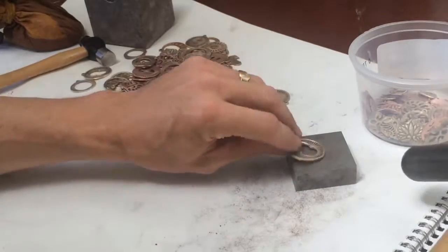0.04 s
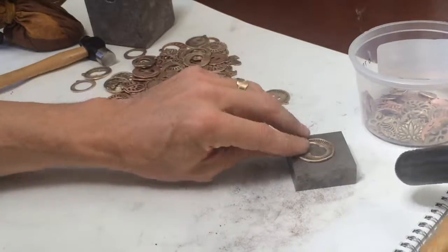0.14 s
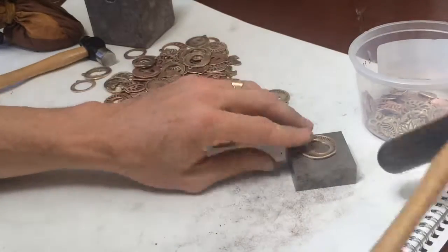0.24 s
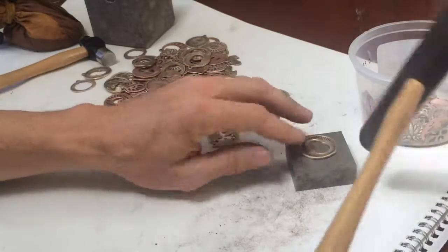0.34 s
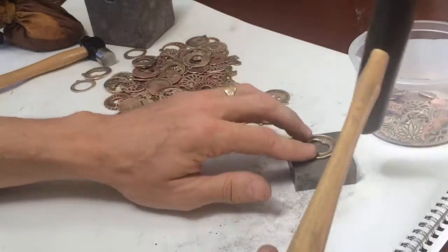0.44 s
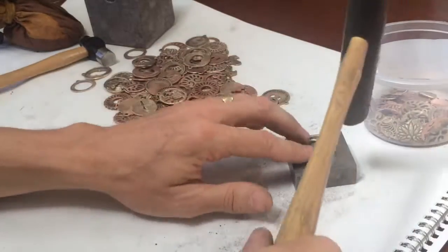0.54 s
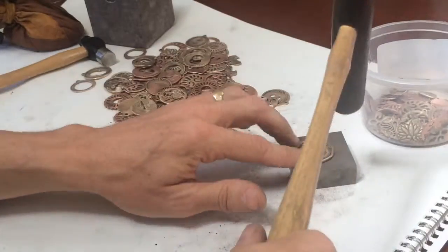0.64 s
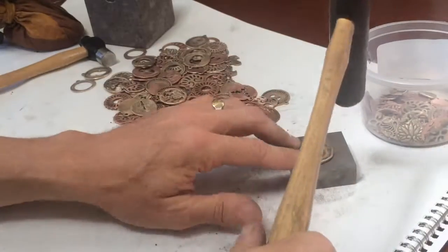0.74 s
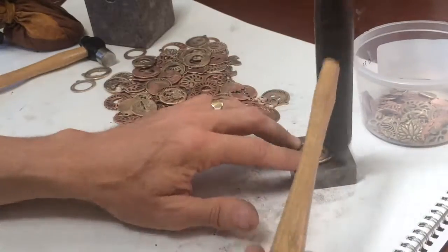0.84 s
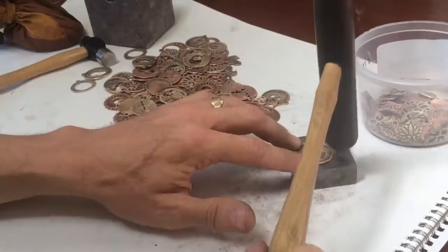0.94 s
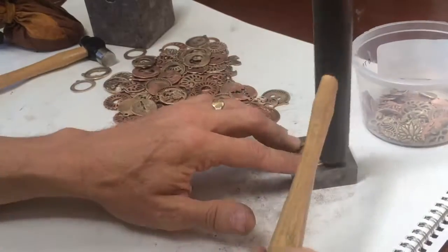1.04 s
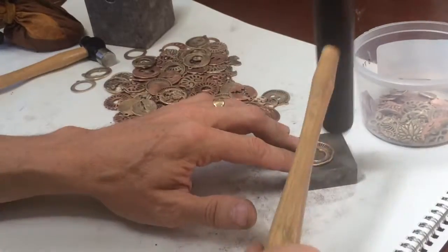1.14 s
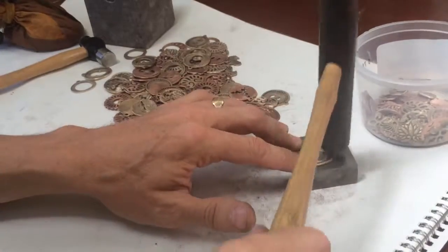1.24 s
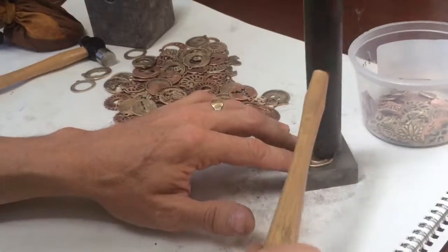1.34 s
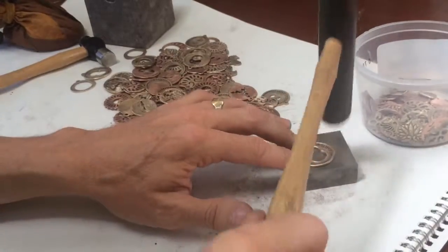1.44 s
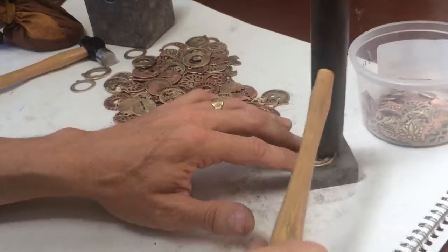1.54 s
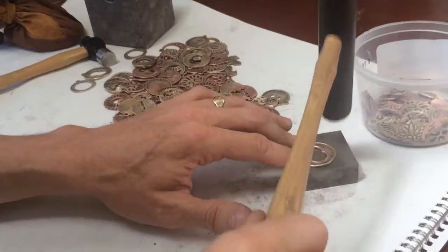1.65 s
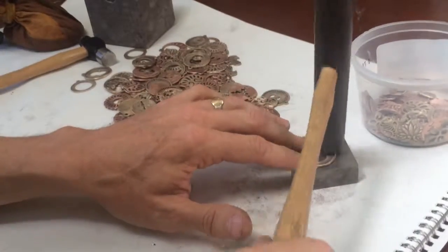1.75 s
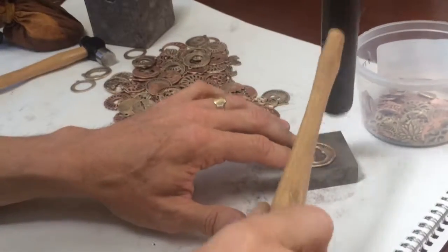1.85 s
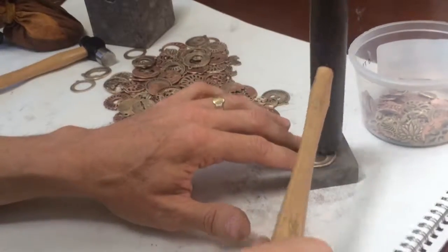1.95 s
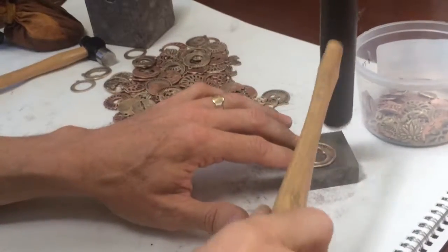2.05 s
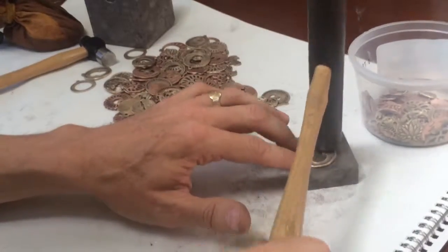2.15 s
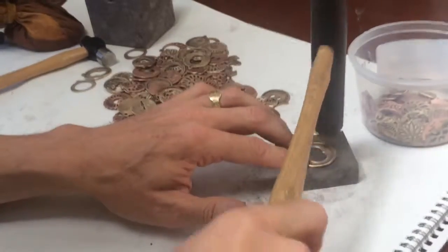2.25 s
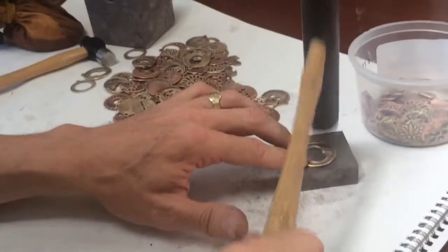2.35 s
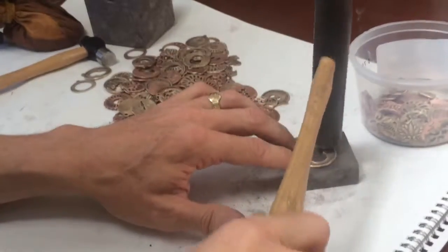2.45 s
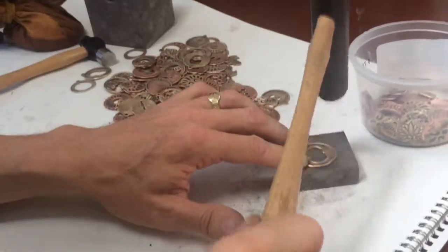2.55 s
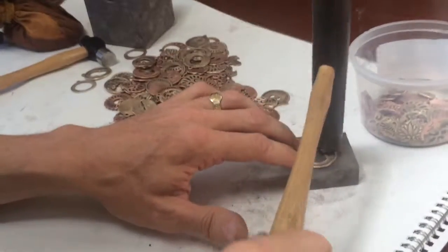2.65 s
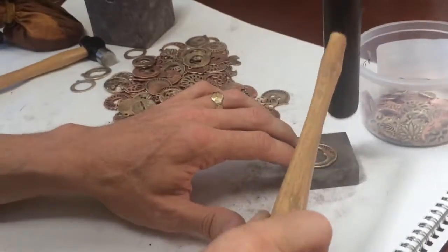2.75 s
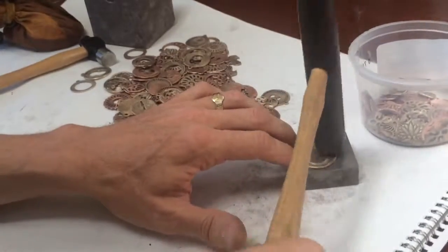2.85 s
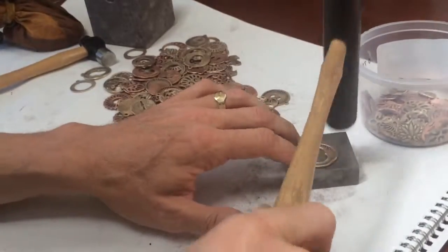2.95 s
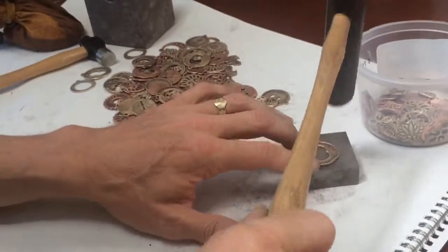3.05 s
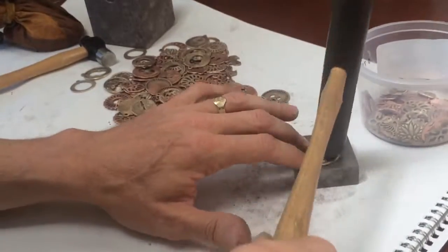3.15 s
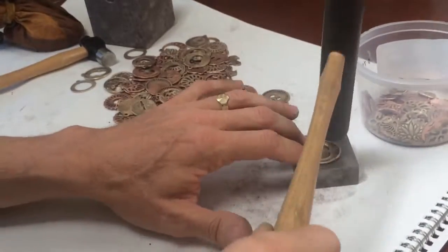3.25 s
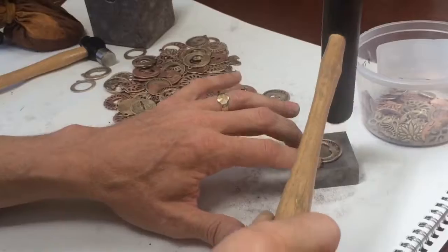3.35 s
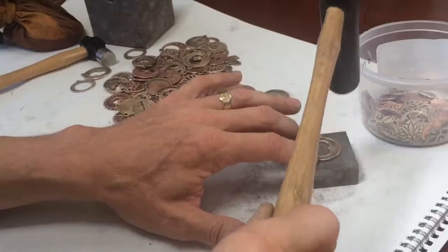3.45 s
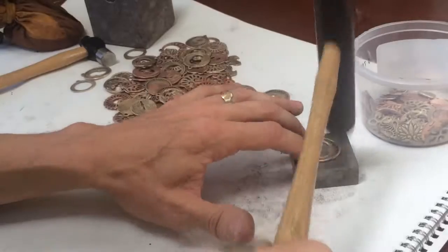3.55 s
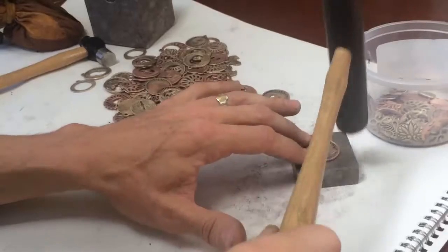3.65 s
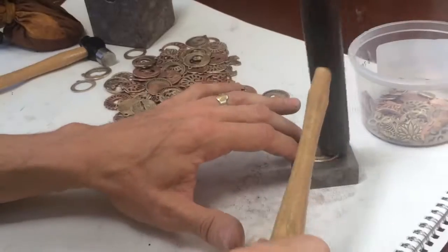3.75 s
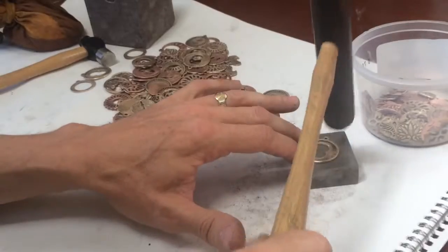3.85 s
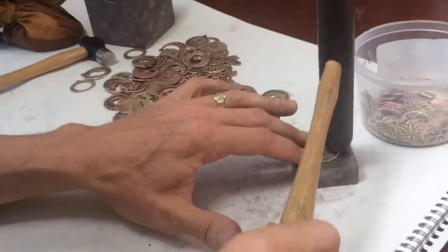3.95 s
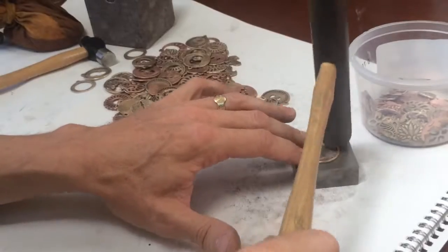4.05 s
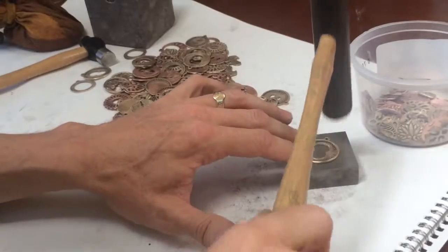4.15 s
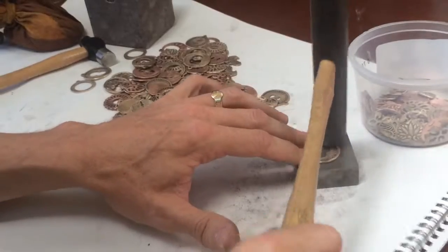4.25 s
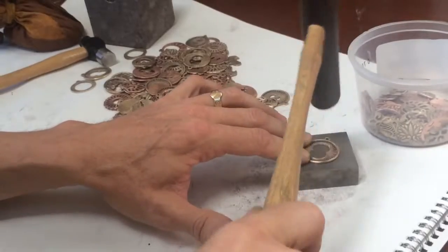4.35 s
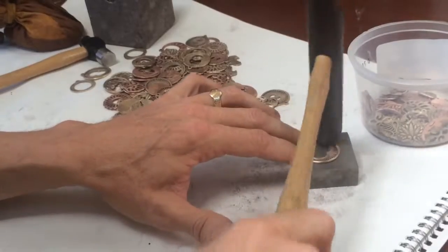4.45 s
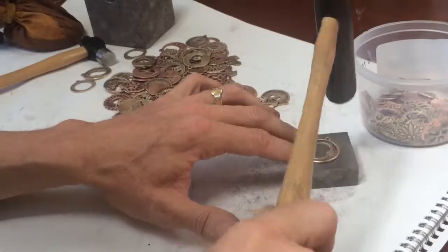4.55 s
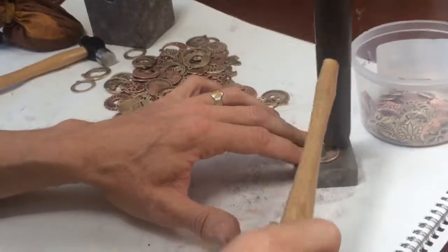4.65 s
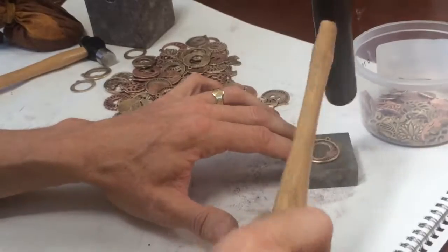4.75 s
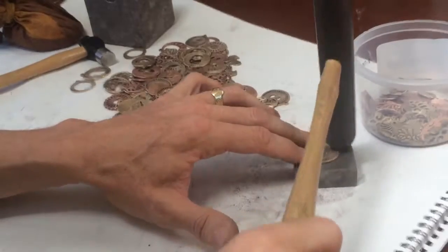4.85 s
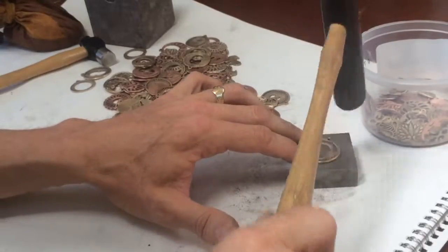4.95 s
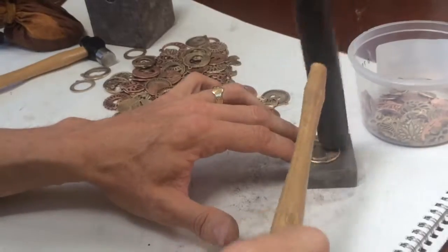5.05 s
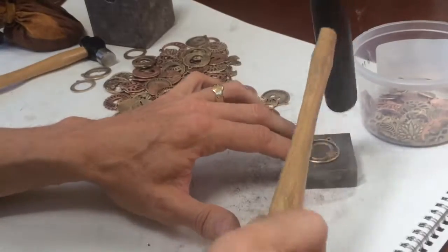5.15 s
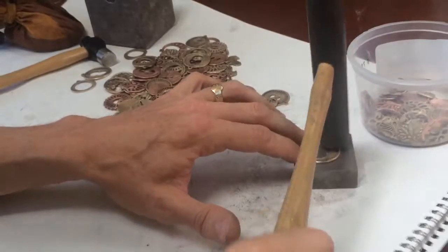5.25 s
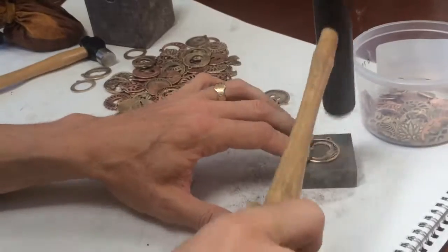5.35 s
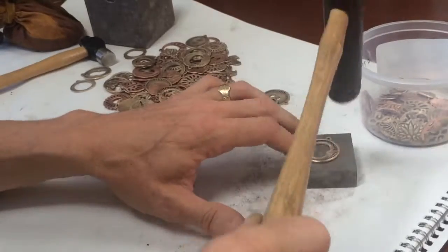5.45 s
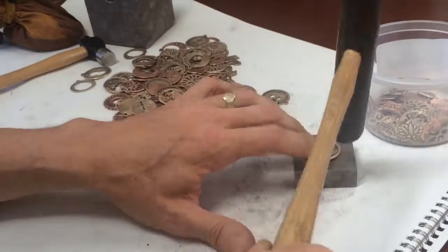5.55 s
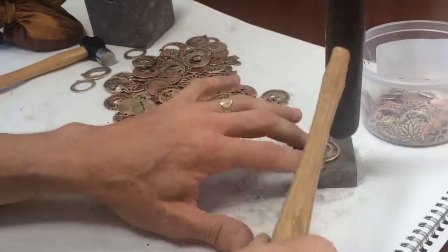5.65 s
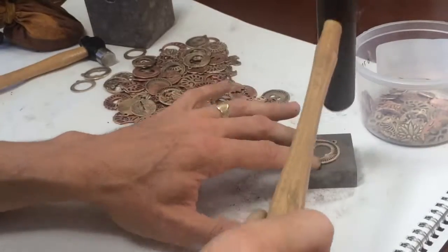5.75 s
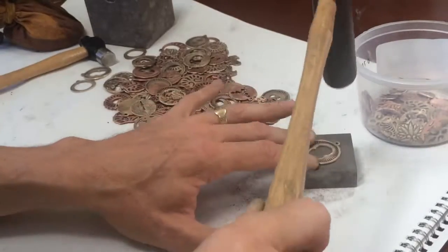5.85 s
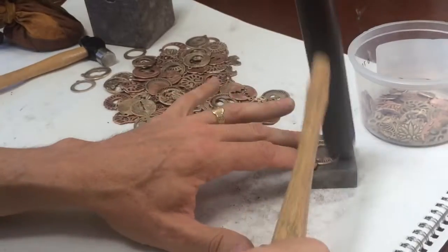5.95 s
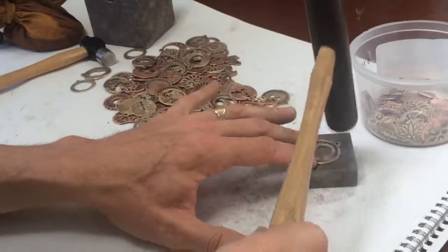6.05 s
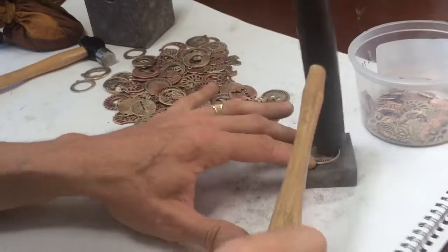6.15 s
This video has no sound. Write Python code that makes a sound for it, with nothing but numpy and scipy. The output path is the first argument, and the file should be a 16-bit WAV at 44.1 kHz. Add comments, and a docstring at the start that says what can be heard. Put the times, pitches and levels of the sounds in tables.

```python
"""Small workshop: a steel hammer flattens a metal disc on a bench block standing on a work table. The disc
ticks as it is laid down, fingers thump it softly (struck modes), and it hisses as it slides (coloured noise).
Each blow cracks (damped steel modes, grit), slaps (one pulse), booms in the table top (modes), rings on in
bench and room (decaying noise bands) and shakes loose discs (showers of clinks). Two runs of blows, the first
ending in a light tap, then the start of a third; faint room tone."""
import sys
import numpy as np
from scipy import signal
from scipy.fft import rfft, irfft
from scipy.io import wavfile

SR = 44100
rng = np.random.default_rng(int(sys.argv[2]) if len(sys.argv) > 2 else 0)


def to_wav(s):
    """Save 16-bit WAV."""
    ch = np.atleast_2d(s).T  # columns
    pcm = np.round(np.clip(ch, -1, 1) * 32767)  # PCM
    wavfile.write(sys.argv[1], SR, pcm.astype(np.int16))


N = 273855
TIME_S = np.arange(N) / SR


def from_db(db):
    """Amplitude ratio of a level in dB."""
    return 10 ** (np.asarray(db) / 20)


def rms_one(x):
    """Scale to rms 1."""
    return x / np.sqrt(np.mean(x ** 2) + 1e-20)


def at_hz(points, hz):
    """Read a table on a log-frequency axis."""
    points = np.array(points)
    return np.interp(np.log(hz), np.log(points[:, 0]), points[:, 1])


def dying(t_s, t60_s):
    """Exponential envelope that falls 60 dB in t60_s."""
    return np.exp(-np.log(1000) * t_s / t60_s)


def place(times_s, sounds):
    """Lay one short sound at each time."""
    out = np.zeros(N)
    for time_s, sound in zip(times_s, sounds):
        start = min(round(time_s * SR), N - 1)
        out[start:start + len(sound)] += sound[:N - start]
    return out


def resonate(drive, hz, t60_s):
    """Two-pole resonator: each impulse starts a dying sine."""
    radius = dying(1 / SR, t60_s)
    angle = 2 * np.pi * hz / SR
    poles = [1, -2 * radius * np.cos(angle), radius * radius]
    return signal.lfilter([0, np.sin(angle)], poles, drive + 1e-18)  # offset avoids denormals


def ring(times_s, level_db, hz, t60_s):
    """One mode, struck at each time with its own level."""
    return resonate(place(times_s, from_db(level_db)[:, None]), hz, t60_s)


def noise(spectrum):
    """Steady noise of a given colour, rms 1."""
    hz = np.maximum(np.arange(N // 2 + 1) * SR / N, 1)
    return rms_one(irfft(rfft(rng.standard_normal(N)) * from_db(at_hz(spectrum, hz)), N))


def bursts(times_s, level_db, t60_s, low_cut_hz):
    """Very short puffs of bright noise."""
    t_s = TIME_S[:SR // 12]
    puffs = rng.standard_normal((len(times_s), len(t_s))) * dying(t_s, t60_s)
    puffs = puffs * from_db(level_db)[:, None]
    high_pass = signal.butter(1, low_cut_hz, "high", fs=SR, output="sos")
    return signal.sosfilt(high_pass, place(times_s, puffs))


# still room, relative spectrum: (frequency [Hz], density [dB per Hz])
AIR_COLOUR = [(18, -66.5), (30, -18.5), (129, -9.5), (195, -6), (404, -15.5), (511, -15.5), (662, -15),
              (953, -18), (1440, -23), (1560, -23.5), (2030, -25.5), (3070, -31), (15000, -36.5)]
AIR_DB = -62.5
# faint steady tones before hum_db: (frequency [Hz], level [dB rms])
HUM_TONES = [(188.4, -69), (247.6, -67), (479.1, -74), (861.3, -73.5), (1007, -91), (1674, -77.5)]


def room_tone(hum_db=-2):
    """Quiet air as coloured noise, plus a few faint sines."""
    hum = 0
    for hz, db in HUM_TONES:
        sine = np.sin(2 * np.pi * (hz * TIME_S + rng.random()))
        hum = hum + from_db(db + hum_db) * np.sqrt(2) * sine
    return from_db(AIR_DB) * noise(AIR_COLOUR) + hum


# finger pushes the disc along the block: (time at full level [s], hold [s], level [dB])
PUSHES = [(.13, .008, -66), (0.277, 0.079, -60), (0.598, .06, -65.5), (.84, 0.012, -65),
          (5.791, 0.028, -68.5)]
PUSH_ATTACK_S, PUSH_RELEASE_S = 0.027, 0.05
# relative spectrum of the hiss: (frequency [Hz], density [dB per Hz])
SLIDE_COLOUR = [(1500, -27), (3000, -9), (5500, -6.5), (9000, -7), (15000, -10)]


def sliding():
    """Friction hiss of the pushed disc: a quick swell, a hold and a release."""
    push = 0
    for time_s, hold_s, db in PUSHES:
        end_s = time_s + hold_s
        corners_s = [time_s - PUSH_ATTACK_S, time_s, end_s, end_s + PUSH_RELEASE_S]
        push = push + from_db(db) * np.interp(TIME_S, corners_s, [0, 1, 1, 0])
    return push * noise(SLIDE_COLOUR)


# handling touches: the disc ticking on the block and soft finger thumps, relative drives: (time [s], tick level
# [dB], soft bump level [dB])
TOUCHES = [(0.173, -40, -52), (.5467, -49, -62), (0.564, -50, -58), (.6714, -49, -60), (5.648, -57.5, -31),
           (5.704, -46, -23.5)]
# disc modes, relative levels: (frequency [Hz], level [dB], t60 [s])
DISC_MODES = [(9500, -18, 0.16), (11500, -16, 0.024), (14000, -10, 0.036), (14400, -11, .025)]


def ticks(click_db=-7, click_t60_s=0.068, click_low_cut_hz=7000, spread_db=3):
    """Disc touches the block: a bright noise click and struck disc modes."""
    times_s, tick_db, _ = np.transpose(TOUCHES)
    out = bursts(times_s, tick_db + click_db, click_t60_s, click_low_cut_hz)
    for hz, db, t60_s in DISC_MODES:
        chance_db = rng.normal(0, spread_db, len(times_s))
        out = out + ring(times_s, tick_db + db + chance_db, hz, t60_s)
    return out


# table top under the block, relative levels: (frequency [Hz], level [dB], free t60 [s])
TABLE_MODES = [(68.6, -15, 0.1), (92.6, -11.5, 0.16), (119.7, -17.5, 0.24), (151.5, -38.5, 0.23),
               (188, -20.5, 0.26), (203.9, -22.5, 0.36), (228.2, -18, 0.25), (283.8, -30, 0.35),
               (308.3, -33.5, 0.31), (369.5, -19, 0.099), (396.2, -19.5, 0.2), (421, -33.5, 0.37),
               (445.4, -21, 0.19), (476.3, -31, 0.42), (503.4, -24.5, 0.22), (612, -28, 0.3),
               (638.5, -26, 0.18), (716, -29.5, 0.17), (789, -30.5, 0.22), (808, -35, 0.47),
               (863, -23.5, 0.23), (1097, -33.5, 0.28), (938, -36.5, 0.49), (959, -24.5, 0.2),
               (1079.6, -24, 0.21), (1060, -37, 0.37), (1155, -30.5, 0.22), (1254, -37, 0.44),
               (1370, -32.5, 0.32), (1466, -32.5, 0.28), (1890, -39.5, 0.24), (2037, -46, 0.31)]
HELD_SHARE = 0.89  # share of its t60 the table keeps while hammer or finger rests on the block


def bumps(count=7):
    """Soft touches drive only the first table modes, more weakly with rising frequency."""
    times_s, _, bump_db = np.transpose(TOUCHES)
    out = 0
    for k, (hz, db, t60_s) in enumerate(TABLE_MODES[:count]):
        softness = TABLE_MODES[0][0] / hz
        out = out + (-1) ** k * softness * ring(times_s, bump_db + db, hz, t60_s * HELD_SHARE)
    return out


# hammer blows: (time [s], strength [dB], squareness [0 = usual, >0 = flat, <0 = tilted])
BLOWS = [(0.9611, -1.8, 1.23), (1.1069, -2.5, 0.14), (1.2687, -1, -0.37), (1.432, -1.7, 0.17),
         (1.622, 1, -0.04), (1.8147, 0.8, -0.42), (2.0212, 0, -0.48), (2.238, 1, 0.0049),
         (2.4573, -0.5, -0.72), (2.6855, 2.1, .3), (2.9178, -0.7, -0.38), (3.2293, -17, 0.93),
         (3.6622, -0.4, -0.84), (3.815, -1.1, -0.47), (3.9747, 0, 1.37), (4.138, -1.65, -0.47),
         (4.3117, 0.7, 0.17), (4.494, -0.4, -1.06), (4.688, 0, -0.15), (4.8906, 0, -1.02),
         (5.0936, -.5, -0.25), (5.2976, 0, 0.95), (6.0549, -0.6, -0.83), (6.206, 4.5, -0.42)]
# A flat blow cracks harder and jolts the loose discs; a tilted one clangs and its wash lasts longer.
# each part of a blow: (usual offset [dB], gain [dB per dB strength], gain [dB per unit squareness])
CRACK = (-3, 0.61, 4.2)
THUMP = (-0.93, 0.26, 0.84)
KNOCK = (1.7, 1.31, 0.65)
CLANG = (-1.6, 0.66, -3.54)
RING = (.4, 0.97, 1)
RATTLE = (2, .7, 1.3)


def part_db(part):
    """Level of one part in every blow, linear in strength and squareness."""
    usual_db, per_strength, per_square_db = part
    _, strength_db, squareness = np.transpose(BLOWS)
    return usual_db + per_strength * strength_db + per_square_db * squareness


# pitch of thump, knock, clang, ring and rattle: (frequency [Hz])
PARTS_HZ = [95, 350, 1250, 4300, 11000]


def drive_db(hz):
    """How hard each blow drives a pitch, interpolated between its parts."""
    levels = np.transpose([part_db(part) for part in (THUMP, KNOCK, CLANG, RING, RATTLE)])
    return np.array([np.interp(np.log(hz), np.log(PARTS_HZ), blow) for blow in levels])


# hammer head and block in contact, relative levels: (frequency [Hz], level [dB], t60 [s])
STEEL_MODES = [(210.3, -22.5, 0.13), (537, -12, 0.0071), (890, -21.5, 0.0099), (1340, -16.5, 0.01),
               (1495, -7.5, 0.0074), (3000, -23.5, 0.02), (3650, -26.5, 0.014), (3970, -14.5, 0.0093),
               (4216, -18.5, 0.019), (6040, -29.5, 0.02), (7200, -25.5, 0.015), (14370, -42.5, 0.0051)]


def crack(spread_db=3.5, grit_db=-23, grit_t60_s=0.025, grit_low_cut_hz=1500):
    """Steel meets the disc: heavily damped modes and a burst of grit as the metal gives."""
    times_s, crack_db = np.array(BLOWS)[:, 0], part_db(CRACK)
    out = bursts(times_s, crack_db + grit_db, grit_t60_s, grit_low_cut_hz)
    for hz, db, t60_s in STEEL_MODES:
        chance_db = rng.normal(0, spread_db, len(times_s))
        out = out - ring(times_s, db + crack_db + chance_db, hz, t60_s)
    return out


# relative spectrum of the dense ringing of bench and room: (frequency [Hz], density [dB per Hz])
WASH_COLOUR = [(30, -49.5), (50, -41), (100, -39.5), (155, -46.5), (320, -48), (440, -45), (700, -48),
               (1150, -46), (1700, -54), (2400, -60.5), (3500, -65), (4350, -66.5), (5000, -70),
               (6500, -67), (9000, -81), (15000, -84.5)]
# its decay before the length factor: (frequency [Hz], t60 [s])
WASH_T60 = [(50, 0.28), (260, 0.29), (700, .3), (1800, 0.35), (3400, 0.34), (4400, 0.38), (5300, 0.3),
            (7500, 0.31), (12800, 0.26)]
# share of its power that repeats from blow to blow: (frequency [Hz], share [0-1])
REPEATS = [(100, 0.4), (500, 0.17), (1200, 0.45), (3000, 0.26), (10000, 0)]
USUAL_LENGTH, SQUARE_SHORTENS = 0.96, 0.085  # t60 factor; share of it lost per unit squareness


def wash(level_db=0.5, build_s=0.0078, first_share=0.55, patchy_db=1.0):
    """Countless modes and reflections: noise bands that build up, then die at their own rates."""
    times_s, _, squareness = np.transpose(BLOWS)
    length = USUAL_LENGTH * (1 - SQUARE_SHORTENS * squareness[:, None])
    t_s = TIME_S[:SR // 2]
    edges_hz = np.geomspace(25, 16500, 38)
    # row 0 is common to all blows; neighbouring bands use alternate noises
    white = rng.standard_normal((len(times_s) + 1, 2, len(t_s))) * np.sqrt(SR / 2)
    tails = 0
    for k, (low_hz, high_hz) in enumerate(zip(edges_hz, edges_hz[1:])):
        hz = np.sqrt(low_hz * high_hz)
        band_pass = signal.butter(2, [low_hz, high_hz], "band", fs=SR, output="sos")
        band = signal.sosfilt(band_pass, white[:, k % 2])
        same = np.clip(at_hz(REPEATS, hz), 0, 1)
        band = np.sqrt(same) * band[0] + np.sqrt(1 - same) * band[1:]
        chance_db = rng.normal(0, patchy_db, len(times_s))
        band_db = at_hz(WASH_COLOUR, hz) + drive_db(hz) + level_db + chance_db
        decay = dying(t_s, at_hz(WASH_T60, hz) * length)
        tails = tails + band * decay * from_db(band_db)[:, None]
    build_up = 1 - (1 - np.clip(first_share, 0, 1)) * np.exp(-t_s / build_s)
    return place(times_s, tails * build_up)


def shimmer(level_db=-46, hz=4400, width_hz=330, t60_s=0.4):
    """A cluster of close steel modes, as decaying narrow-band noise: a rough, high ring."""
    t_s = TIME_S[:SR // 2]
    edges_hz = [hz - width_hz / 2, hz + width_hz / 2]
    cluster = signal.butter(2, edges_hz, "band", fs=SR, output="sos")
    rings = rms_one(signal.sosfilt(cluster, rng.standard_normal((len(BLOWS), len(t_s)))))
    levels = from_db(part_db(RING) + level_db)[:, None]
    return place(np.array(BLOWS)[:, 0], rings * dying(t_s, t60_s) * levels)


def rattle(level_db=-41, per_s=2400, hop_s=0.014, spread_db=1.5, ring_t60_s=0.018, count=48):
    """Loose discs hop off the shaken table and land in a shower of random clinks."""
    times_s, t_s = np.array(BLOWS)[:, 0], TIME_S[:SR // 6]
    shower = t_s / hop_s * np.exp(1 - t_s / hop_s)  # peaks at hop_s
    size = place(times_s, shower * from_db(part_db(RATTLE) + level_db)[:, None])
    landings = rng.random(N) < per_s / SR
    clinks = size * landings * from_db(rng.normal(0, spread_db, N)) * rng.choice([-1, 1], N)
    pitch_index = rng.integers(0, count, N)
    out = 0
    for k, hz in enumerate(np.linspace(5500, 15000, count)):
        out = out + resonate(clinks * (pitch_index == k), hz, ring_t60_s)
    return out


# faint lasting rings of table and steel, relative levels: (frequency [Hz], level [dB], free t60 [s])
LONG_MODES = [(190.06, -35.5, 1.15), (4400, -50.5, 0.45), (4295, -50, .36), (6160, -64, .22),
              (10400, -59.5, .2), (11730, -56, 0.15)]
REBOUND_DB = -8  # a weaker blow does not rebound: the hammer stays down


def table_boom(thump_db=0.0, knock_db=-2.5, clang_db=0.3, spread_db=2.0, lag_s=0.001003):
    """The block drives table modes of alternating sign, so the boom swells after the crack."""
    times_s, strength_db, _ = np.transpose(BLOWS)
    times_s, held = times_s + lag_s, strength_db < REBOUND_DB
    out = 0
    for k, (hz, db, t60_s) in enumerate([*TABLE_MODES, *LONG_MODES]):
        coupling_db = np.interp(np.log(hz), np.log(PARTS_HZ[:3]), [thump_db, knock_db, clang_db])
        # the higher the mode, the more it depends on where the blow lands
        place_factor = min(np.sqrt(hz / PARTS_HZ[1]), 2)
        chance_db = rng.normal(0, spread_db, len(times_s)) * place_factor
        level_db = db + coupling_db + drive_db(hz) + chance_db
        free = ring(times_s[~held], level_db[~held], hz, t60_s)
        damped = ring(times_s[held], level_db[held], hz, t60_s * HELD_SHARE)
        out = out + (-1) ** k * (free + damped)
    return out


def slap(level_db=-1.0, width_s=0.00026, lag_s=0.00147, lag_spread_s=0.00021):
    """The block is driven into the table: one pressure peak between two troughs."""
    times_s = np.array(BLOWS)[:, 0]
    peak_s = lag_s + rng.normal(0, lag_spread_s, (len(times_s), 1))
    u = (TIME_S[:SR // 100] - peak_s) / width_s
    pulse = (1 - u ** 2) * np.exp(-u ** 2 / 2)
    return place(times_s, pulse * from_db(part_db(CRACK) + level_db)[:, None])


def scene():
    """Sum of room, handling and hammering, one channel."""
    handling = sliding() + ticks() + bumps()
    blows = crack() + wash() + shimmer() + rattle() + table_boom() + slap()
    return (room_tone() + handling + blows)[None]


def record(dry, ceiling=0.54, low_cut_hz=22, high_cut_hz=15300):
    """Cut the deepest rumble, round the highest peaks (tanh), cut the top."""
    high_pass = signal.butter(2, low_cut_hz, "high", fs=SR, output="sos")
    low_pass = signal.ellip(10, 0.1, 80, high_cut_hz, fs=SR, output="sos")
    heard = signal.sosfilt(high_pass, dry)
    rounded = ceiling * np.tanh(heard / ceiling)
    return signal.sosfilt(low_pass, rounded)


dry = scene()
out = record(dry)
to_wav(out)
```